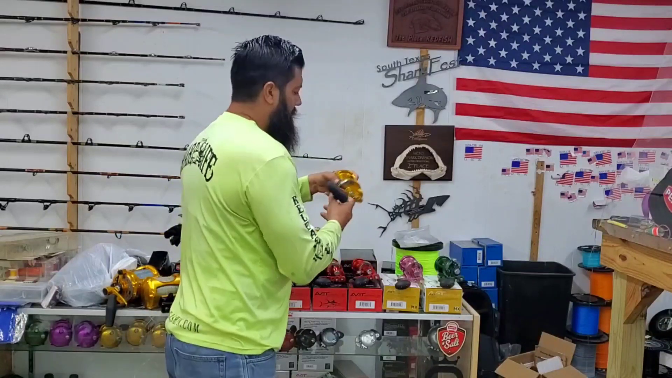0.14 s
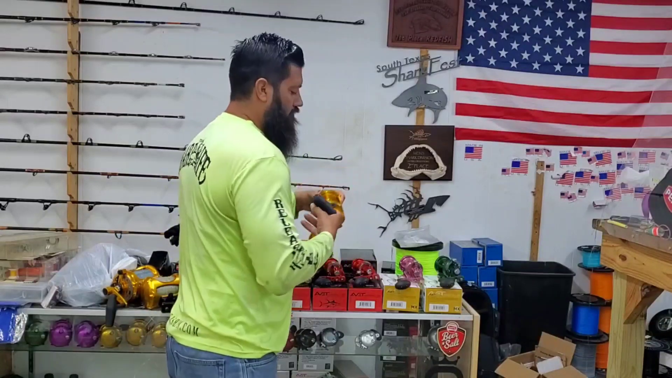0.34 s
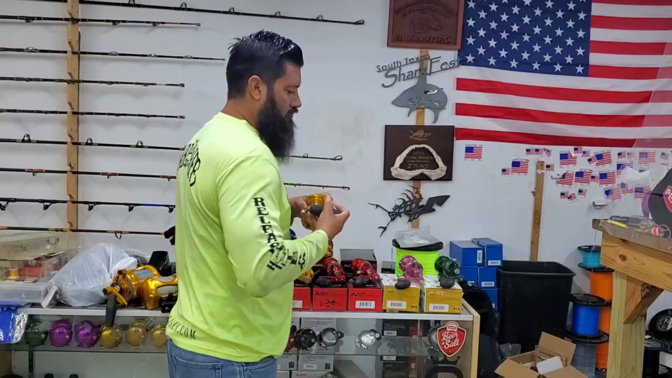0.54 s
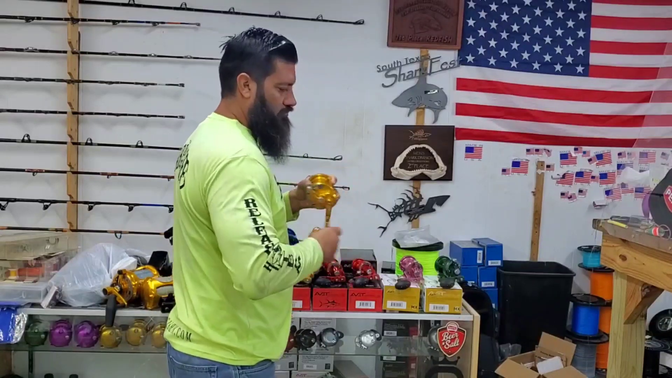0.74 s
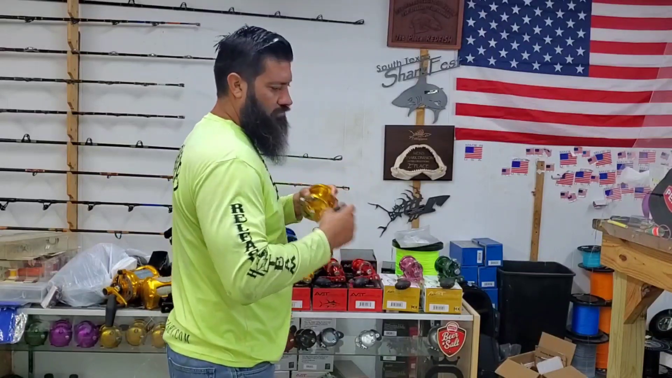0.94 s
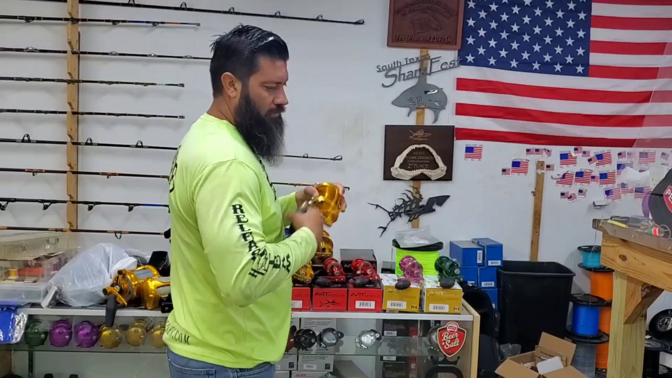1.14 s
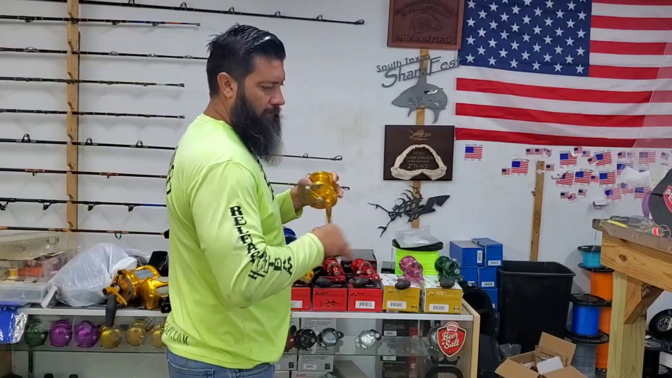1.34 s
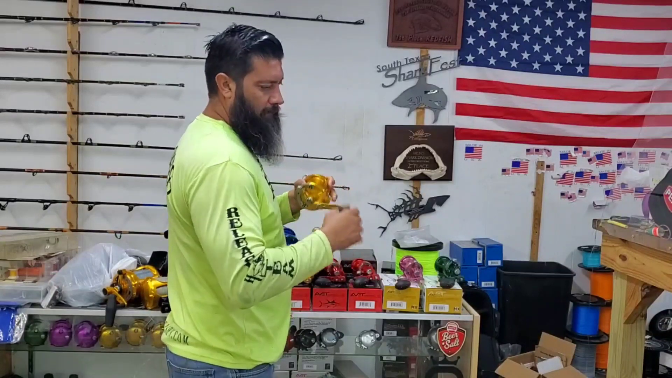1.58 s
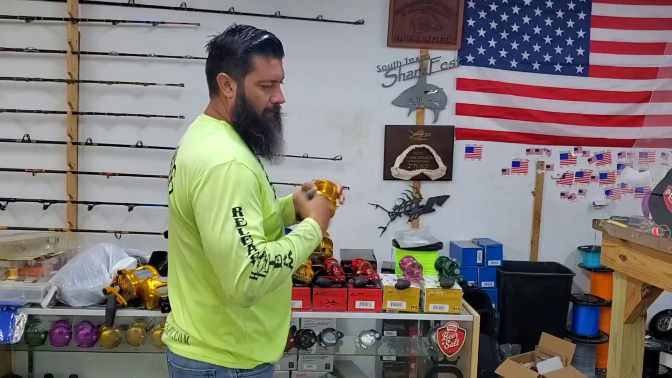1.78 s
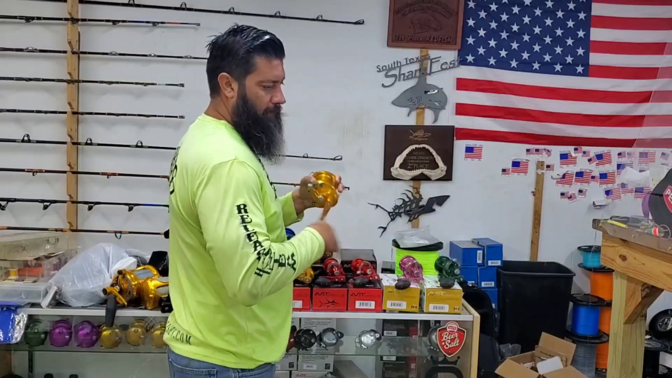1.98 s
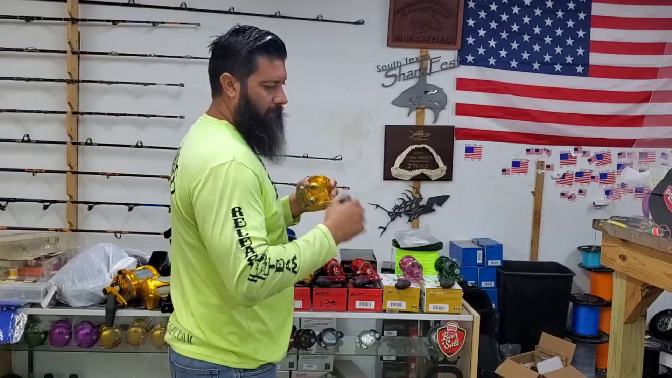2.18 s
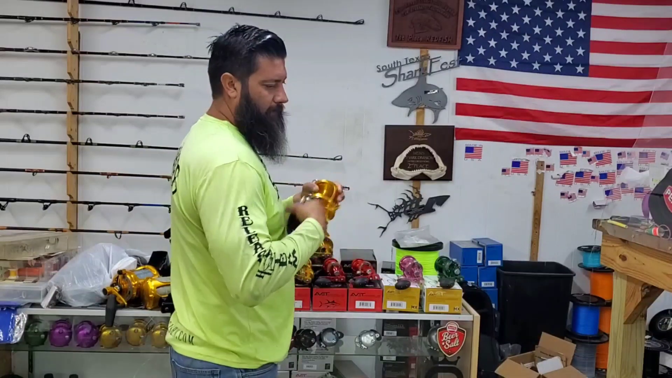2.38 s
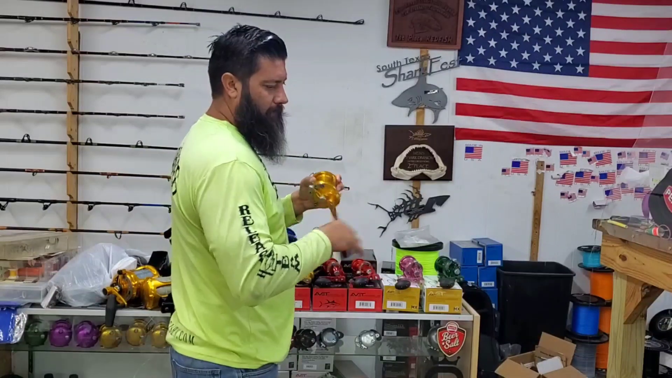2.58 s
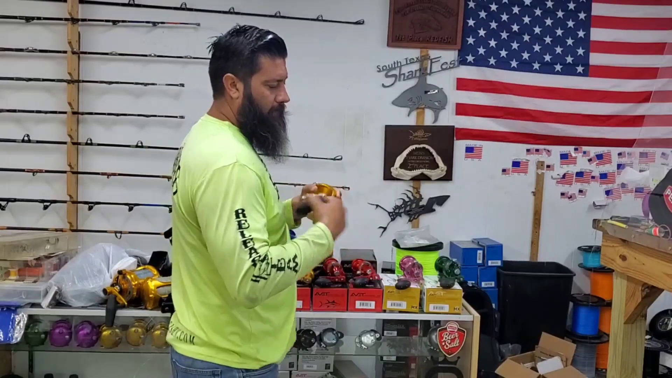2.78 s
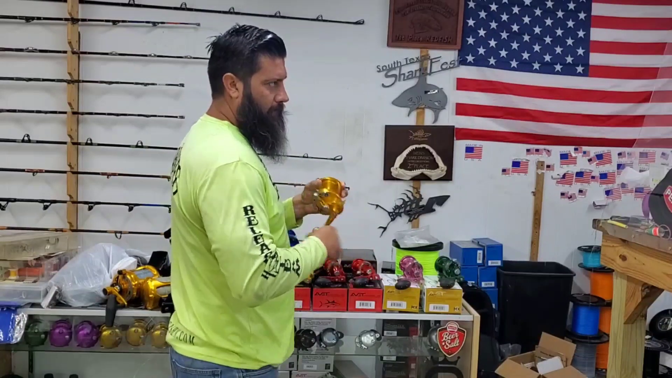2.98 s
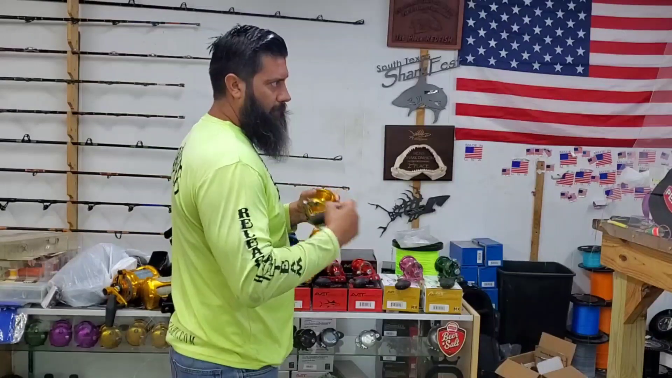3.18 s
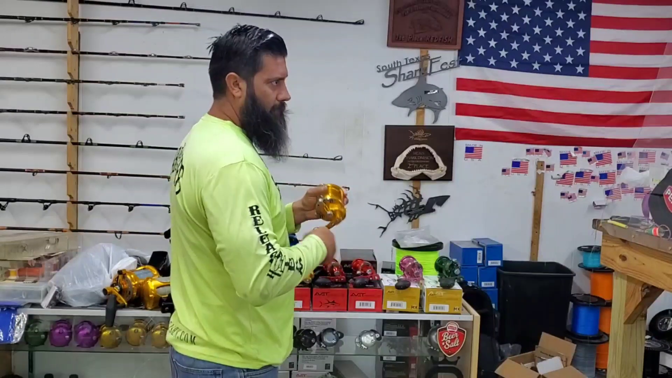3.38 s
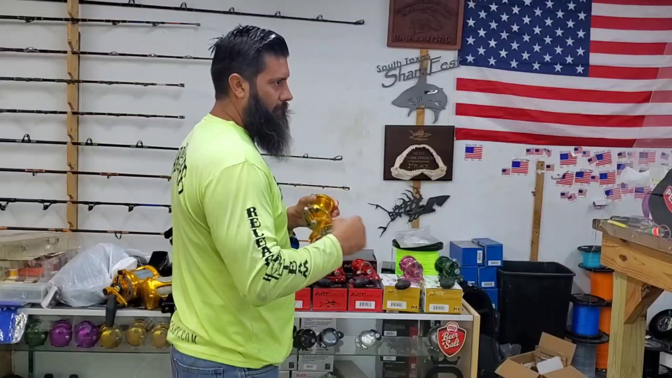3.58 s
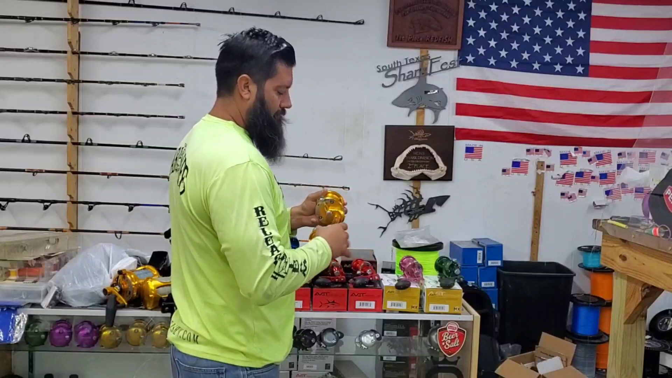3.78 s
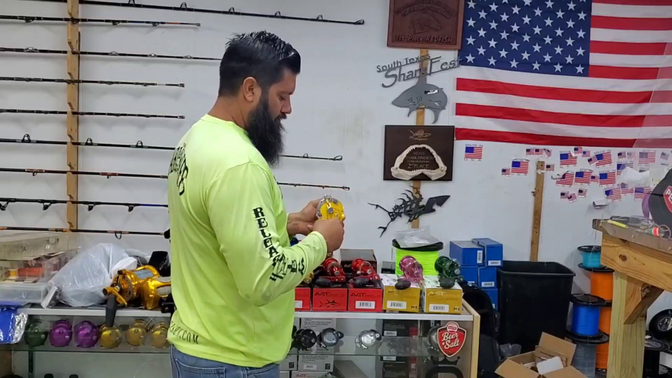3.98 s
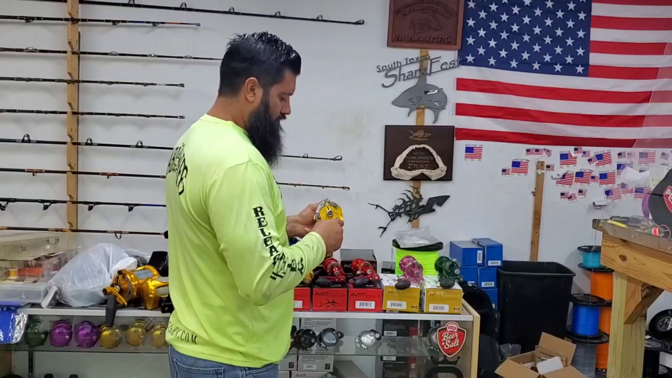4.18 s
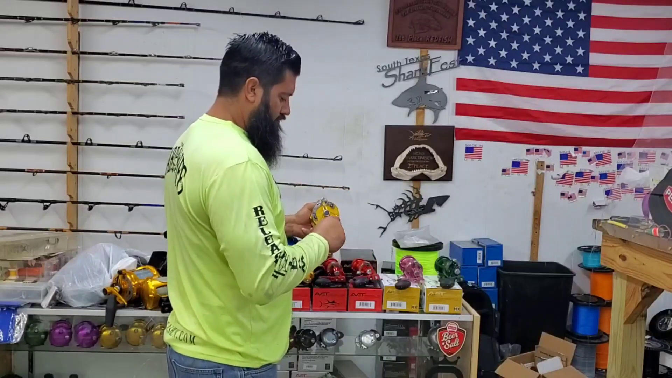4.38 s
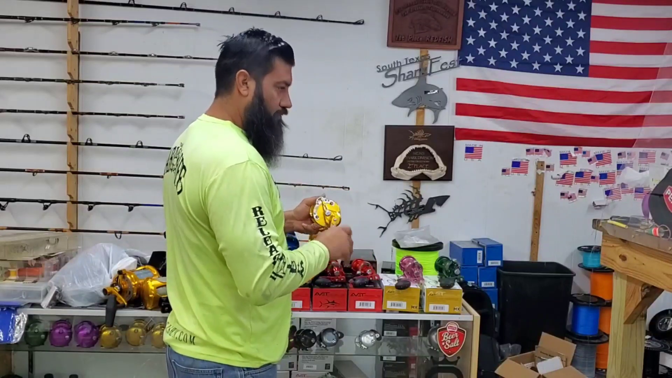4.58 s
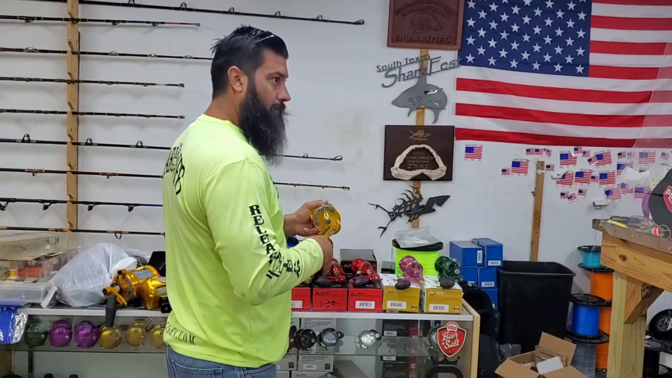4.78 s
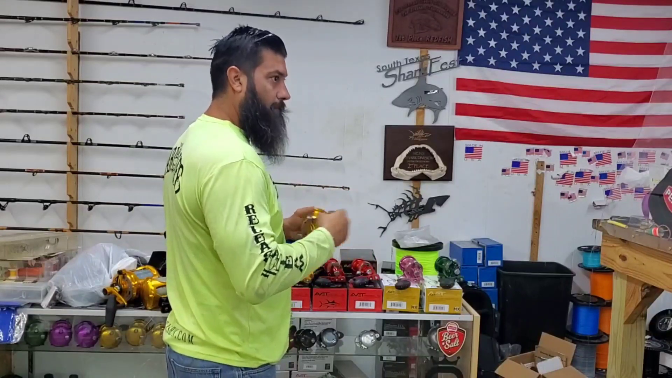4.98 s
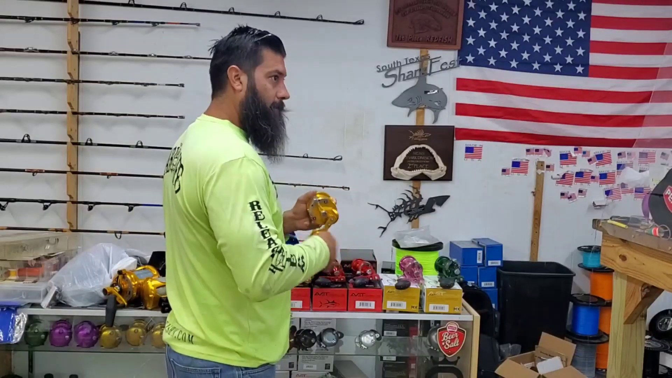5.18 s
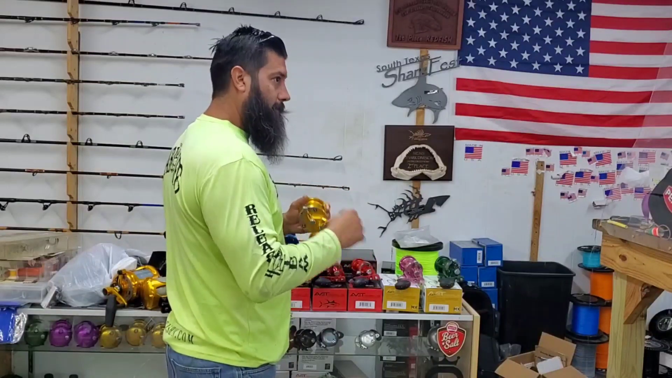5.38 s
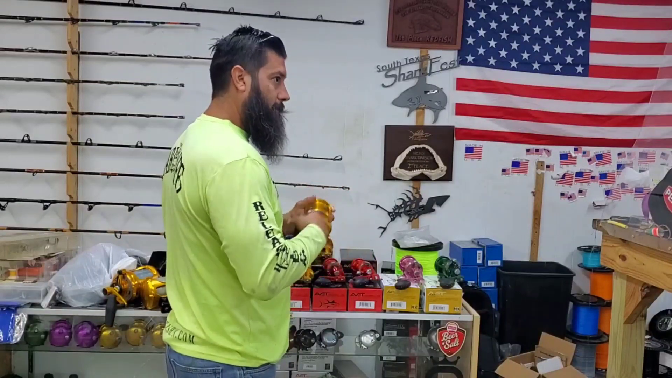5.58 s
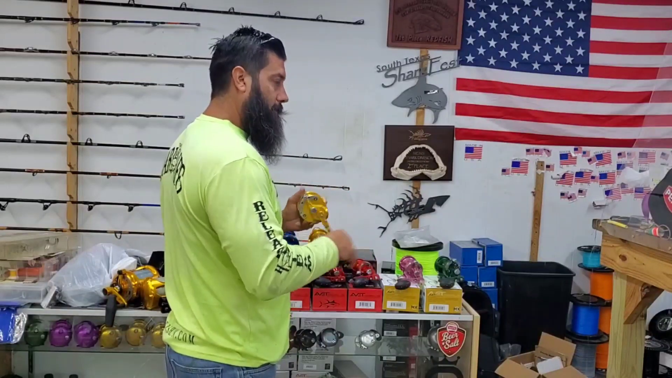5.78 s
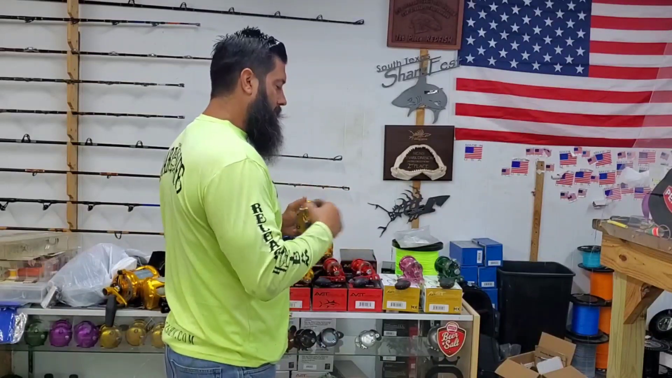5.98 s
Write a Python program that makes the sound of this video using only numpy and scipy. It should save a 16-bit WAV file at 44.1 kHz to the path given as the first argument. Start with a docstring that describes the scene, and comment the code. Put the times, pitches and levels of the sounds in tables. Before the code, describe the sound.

A metal fishing reel's clicker ticks, then buzzes in a long run, stops, snaps over, and buzzes over twice as fast, above low ventilation rumble.

```python
"""Ventilation rumbles and hums in a shop; over it the clicker of a big metal fishing reel ticks, a few steps away.
The pawl ticks over single teeth, then buzzes at about 100 teeth a second; the reel stops, a lever snaps over,
and a second run goes more than twice as fast. Each tooth is an impulse through resonances of pawl, spool,
side plate and frame. Noise reflections blur the ticks; the ventilation is filtered noise with wavering sines."""
import sys
import numpy as np
from scipy import signal
from scipy.fft import rfft, irfft, next_fast_len
from scipy.io import wavfile
from scipy.ndimage import uniform_filter1d

SR = 44100
rng = np.random.default_rng(int(sys.argv[2]) if len(sys.argv) > 2 else 0)


def dump_mix(stems):
    """Bounce the given channels to the path in sys.argv[1] as a 16-bit WAV at rate SR."""
    frames = np.atleast_2d(stems).T  # one column per channel
    limited = np.clip(frames, -1, 1)  # hard clip at full scale
    pcm = np.round(limited * 32767).astype(np.int16)
    wavfile.write(sys.argv[1], SR, pcm)


N = 266356
TIME = np.arange(N) / SR
BINS = np.fft.rfftfreq(8192, 1 / SR)

# single teeth while the spool barely turns:
# (time [s], relative tick level [dB], relative level of the side plate's ring [dB])
SINGLE_TEETH = [(0.172, -22, -36), (.2140, -2.5, -6), (.2500, -1, 1), (.2835, -0.5, 2), (.3330, 2, -3.5),
                (0.3935, -0.5, -4), (0.418, -29, -36), (0.504, -1, -3.5), (.5390, 0, 0), (.5660, 2.5, -1.5),
                (.6010, -1, -1), (.6390, 1.5, 0), (.6980, -0.5, -14), (.7200, 0.5, 3), (.7400, 0.5, -9),
                (3.8105, 0, -9), (3.8330, -5.5, -5), (3.8630, -3.5, -20), (3.8725, -11, -6.5),
                (4.8575, -2.5, -1), (4.8735, 0, 1.5)]
# spectrum of the pawl's dry tick: (frequency [Hz], relative level [dB])
TICK_COLOUR = [(200, -22), (700, -18.5), (1300, -19), (2150, -11.5), (2580, -16), (3480, -16), (3740, 1),
               (4250, -1.5), (5600, -4.5), (6900, -2.5), (8700, -8.5), (9500, -0.5), (10900, -7.5),
               (13400, 3.5), (15500, -10.5)]
# modes of the spool and its housing:
# (frequency [Hz], width [Hz], relative level at low speed [dB], relative level at high speed [dB])
SPOOL_MODES = [(2870, 202, -4, -1.5), (3212, 113, -6, -2), (4681, 73, 13, 13), (7460, 170, 0.5, 3),
               (7780, 50, 0.5, 8.5), (8290, 150, 3.5, 5.5), (8990, 48, 9, 13.5), (9930, 220, 9.5, 13),
               (10060, 50, 16, 19), (11840, 610, 1, 10), (13350, 77, 3.5, 7)]
# the hand pushes the crank harder or eases off, and the spool follows:
# (centre time [s], length [s], extra speed [teeth/s])
HAND_PUSHES = [(1.13, .2, 12), (2.74, .13, 14), (3.02, 0.16, 23), (3.31, .17, 29.5), (3.70, .16, 26.5),
               (4.96, 0.089, 14), (5.08, .1, -15.5), (5.18, .12, 28), (5.32, .1, -7), (5.595, .25, 53),
               (5.83, .1, 26)]
# the side plate rings out more loudly: (centre time [s], length [s], boost [dB])
PLATE_SWELLS = [(1.14, 0.058, 4.5), (1.61, 0.12, 3), (2.69, 0.078, 7.5), (3.03, .14, 5), (3.35, 0.17, 5.5),
                (3.74, 0.087, 7.5), (5.02, 0.33, 4), (5.32, 0.093, 6), (5.59, 0.24, 9), (5.98, 0.26, 7.5)]
# course of the frame's whine in each run: (time [s], relative level [dB])
SLOW_RUN_WHINE = [(0.75, -55.5), (0.89, -43.5), (2.47, -43.5), (3.4, -48.5), (3.52, -54.5), (3.72, -46),
                  (3.8, -56)]
FAST_RUN_WHINE = [(4.88, -69), (4.938, -45), (5.096, -45.5), (5.17, -40), (5.486, -44), (5.654, -50),
                  (5.804, -40.5), (6.04, -48.5)]
# the lever snaps over and rattles: (time [s], relative level [dB])
LEVER_SNAPS = [(4.4470, -6.5), (4.4500, -1), (4.4644, -17)]
# spectrum of the lever's snap: (frequency [Hz], relative level [dB])
SNAP_COLOUR = [(150, -17.5), (500, -8), (1000, 1.5), (1500, -2), (2300, 3.5), (4000, 1), (5700, -5),
               (7200, -5), (8300, -0.5), (10000, -4.5), (12000, 0.5), (15500, -4)]
# light touches on the handle: (time [s], relative level of the low ping [dB], of the high ping [dB])
HANDLE_TOUCHES = [(.178, -41.5, -53), (4.767, -54, -55), (4.793, -51, -73)]
# the handle's two pings, low and high: (frequency [Hz], time to fall by 60 dB [s])
HANDLE_PINGS = [(5700, 0.14), (9330, 0.11)]
# balance of the reel's ticks: (frequency [Hz], left over right [dB])
TICK_BALANCE = [(500, 3), (1000, 3.5), (3000, -0.5), (4700, 3.5), (6400, -7), (7000, -2), (7850, 13),
                (8400, 1), (9000, -1), (10000, 1.5), (12300, 0), (13400, -3.5), (15000, 19)]
# decay of the shop's reflections: (frequency [Hz], time to fall by 60 dB [s])
ROOM_DECAY = [(300, 0.15), (800, 0.24), (2000, 0.35), (5500, 0.29), (10000, 0.33), (15000, 0.21)]
# spectrum of the ventilation's air: (frequency [Hz], relative density [dB per Hz])
AIR_COLOUR = [(15, -30.5), (27, -21), (42, -6), (85, -3.5), (130, -8), (160, -4), (205, -13), (330, -16.5),
              (600, -22), (760, -21), (1000, -28), (2500, -36), (6000, -51), (15500, -57.5)]
# how alike the air is in both channels: (frequency [Hz], left-right correlation)
AIR_CORRELATION = [(60, 0.97), (150, 1), (300, 0.88), (600, 0.75), (1500, 0.0028), (8000, 0)]
# hum of the fan motor: (frequency [Hz], level [dB])
MOTOR_HUM = [(81.5, -45.5), (120, -44.5), (240, -53.5)]

PLATE_HZ, PLATE_WIDTH_HZ = 6400, 67
FRAME_WIDTH_HZ = 145


def run(rooms, speed, whine_level, fast, wobble, buzz_db, buzz_sag_db_per_s, push_db, ring_db,
        ring_sag_db_per_s, frame_db, frame_hz, direct_db, jitter_s, uneven_db):
    """A tooth passes at each whole turn of the phase: it ticks, rings the side plate and shakes the frame."""
    s, steady = np.transpose(speed)
    start, end = s[0], s[-1]
    inside = (TIME >= start) & (TIME < end + .5)  # leaves time to ring out
    t = TIME[inside]

    # the pace: steady cranking, the hand's pushes and a waver
    cruise = np.interp(t, s, steady)
    pushed = cruise + bumps(HAND_PUSHES, t)
    rate = pushed * np.exp(wobble * flutter(len(t), rate_hz=6))
    phase = np.cumsum(rate * (t < end)) / SR
    times = t[np.diff(np.ceil(phase), prepend=0) > 0]

    # no two teeth are quite alike in timing and force; faster teeth are each weaker
    timing, uneven = rng.standard_normal((len(times), 2)).T
    sizes = gain_of(uneven_db * uneven) * np.sqrt(SR / np.interp(times, t, rate))

    # the force rises quickly, then drifts; a push adds push_db for each doubling of the speed
    age = np.minimum(t, end) - start
    attack = 1 - np.exp(-age / .026)
    push_boost_db = push_db * np.log2(pushed / cruise)
    buzz = attack * gain_of(buzz_db - buzz_sag_db_per_s * age + push_boost_db)
    swell_db = bumps(PLATE_SWELLS, start + age)
    chance_db = 2 * flutter(len(t), rate_hz=11)
    ring = attack * gain_of(ring_db - ring_sag_db_per_s * age + swell_db + chance_db)
    whine = gain_of(frame_db + np.interp(t, *np.transpose(whine_level)))

    drive = pawl(times - t[0] + jitter_s * timing, sizes, len(t))
    ticks = in_room(body_smear(convolve(drive * buzz, reel(fast))), rooms, direct_db)
    plate = in_room(convolve(drive, mode(PLATE_HZ, PLATE_WIDTH_HZ)), rooms, direct_db)
    # the heavy frame feels the regular push of the teeth,
    # so harmonics of the speed glide through its resonance
    pushes = blows(times - t[0] + jitter_s * timing / 3, sizes, len(t))
    frame = in_room(convolve(pushes, mode(frame_hz, FRAME_WIDTH_HZ)), rooms, direct_db=-3.5)

    out = np.zeros((2, N))
    out[:, inside] = ticks + ring * driven(plate, t, start, end) + whine * driven(frame, t, start, end)
    return out


def spool(start_s, end_s, first_rate, full_rate, spin_up_s, tiring_per_s3):
    """Rows (time [s], speed [teeth/s]): the spool spins up exponentially, then slows as the arm tires."""
    age = np.linspace(0, end_s - start_s, num=200)
    spinning_up = (first_rate - full_rate) * np.exp(-age / spin_up_s)
    return np.transpose([start_s + age, full_rate + spinning_up - tiring_per_s3 * age ** 2])


def single_teeth(level_db=2.3, ring_db=2, frame_db=-19, settle_db=-8, settle_s=.017):
    """Separate ticks as the spool starts and stops, each with a ring of side plate and frame."""
    s, db, plate_db = np.transpose(SINGLE_TEETH)
    # at this slow pace the pawl has time to settle against the next tooth with a softer tick
    settle = s + settle_s * rng.uniform(.7, 1.3, len(s))
    first = pawl(s, gain_of(db + level_db))
    second = pawl(settle, gain_of(db + level_db + settle_db))
    drive = first + second
    ticks = body_smear(convolve(drive, reel(0)))
    plate = convolve(blows(s, gain_of(plate_db + ring_db)), mode(PLATE_HZ, PLATE_WIDTH_HZ))
    frame = gain_of(frame_db) * convolve(drive, mode(1050, FRAME_WIDTH_HZ))
    return ticks + plate + frame


def pawl(times, sizes, count=N, bounce=0.6, bounce_s=.002):
    """The pawl drops on each tooth and bounces once, after a slightly random wait."""
    late = rng.uniform(.3, 1.7, len(times))
    return blows(times, sizes, count) + blows(times + bounce_s * late, sizes * bounce, count)


def reel(fast, skirt=1.49):
    """One tooth heard left and right: the tick plus the modes, whose mix shifts with speed (fast 0-1)."""
    power = gain_of(read(TICK_COLOUR, BINS)) ** 2
    for hz, width, slow_db, fast_db in SPOOL_MODES:
        peak = gain_of(slow_db + fast * (fast_db - slow_db)) ** 2
        power = power + peak / (1 + (2 * (BINS - hz) / width) ** 2) ** skirt
    half_balance_db = read(TICK_BALANCE, BINS) / 2
    return np.array([causal(np.sqrt(power) * gain_of(side * half_balance_db)) for side in (1, -1)])


def mode(hz, width):
    """A strong resonance with steep skirts and energy 1."""
    t = TIME[:SR // 8]
    ring = t * np.exp(-np.pi * width * t) * np.sin(2 * np.pi * hz * t)
    return ring / np.linalg.norm(ring)


def driven(tone, t, start, end):
    """Holds a ring near level 1 while the teeth drive it; afterwards it dies freely."""
    power = tone.mean(0) ** 2 + (tone ** 2).mean(0)
    swell = np.sqrt(abs(uniform_filter1d(power, size=3000)) / 2 + 1e-6)
    return tone / np.interp(np.clip(t, start + 0.13, end - .02), t, swell)


def body_smear(x, smear_s=0.000415):
    """The reel's body delays each frequency a little, differently towards left and right."""
    knots = rng.random((2, 12))
    shape = [np.interp(BINS, np.linspace(0, SR / 2, len(side)), side) for side in knots]
    delay = smear_s * 2 * np.array(shape)
    # summing group delay over frequency gives the phase of an all-pass
    phase = -2 * np.pi * np.cumsum(delay, axis=1) * BINS[1]
    return convolve(x, irfft(np.exp(1j * phase))[:, :SR // 100])


def lever(level_db=6):
    """A dull snap with hardly any ring: impulses through a broad spectrum."""
    s, db = np.transpose(LEVER_SNAPS)
    return convolve(blows(s, gain_of(db + level_db)), causal(gain_of(read(SNAP_COLOUR, BINS))))


def handle():
    """Faint metal pings, decaying sines, at light touches of the hand."""
    s, *levels = np.transpose(HANDLE_TOUCHES)
    t = TIME[:SR // 3]
    pings = 0
    for db, (hz, t60) in zip(levels, HANDLE_PINGS):
        ping = np.sin(2 * np.pi * hz * t) * gain_of(-60 * t / t60)
        pings = pings + convolve(blows(s, gain_of(db)), ping)
    return pings


def in_room(x, rooms, direct_db, sway_hz=1.6):
    """Direct sound plus reflections; as the reel sways in the hand, it passes from one set of paths to the next."""
    angle = 2 * np.pi * sway_hz * TIME[:x.shape[-1]]
    wet = 0
    for k, room in enumerate(rooms):
        share = np.cos(angle + np.pi * k / len(rooms)) * np.sqrt(2 / len(rooms))
        wet = wet + convolve(x * share, room)
    return (wet + gain_of(direct_db) * x) / np.hypot(1, gain_of(direct_db))


def shop(early_db=-13.0, early_s=0.017):
    """Two-channel reflections with energy near 1: quick scatter off counter and wall, and a dense tail."""
    t = TIME[:SR // 2]
    hz, at, z = signal.stft(rng.standard_normal((2, len(t))), SR, nperseg=256)
    decay = gain_of(-60 * at / read(ROOM_DECAY, hz)[:, None])
    tail = signal.istft(z * decay, SR, nperseg=256)[1][:, :len(t)]
    scatter = rng.standard_normal(tail.shape) * np.exp(-t / early_s)
    # the room keeps its fine comb but favours no broad band
    spectrum = rfft(evened(tail) + gain_of(early_db) * evened(scatter), 2 * len(t))
    broad = np.sqrt(uniform_filter1d(abs(spectrum) ** 2, size=200, axis=1))
    return irfft(spectrum / broad)[:, :len(t)]


def ventilation(air_db=-37.5, waver=0.26):
    """Rumbling air, noise alike in both channels in the bass, and a motor hum whose phase wavers."""
    size = next_fast_len(N, True)
    hz = np.fft.rfftfreq(size, 1 / SR)
    a, b = rfft(rng.standard_normal((2, size)))
    same = np.clip(read(AIR_CORRELATION, hz), -1, 1)
    pair = np.array([a, same * a + np.sqrt(1 - same ** 2) * b])
    air = evened(irfft(pair * gain_of(read(AIR_COLOUR, hz)))[:, :N])
    hum = 0
    for f, db in MOTOR_HUM:
        drift = evened(irfft(rfft(rng.standard_normal(size)) / (1 + (hz / 3) ** 4))[:N])
        tone = np.sin(2 * np.pi * f * TIME + waver * np.pi * drift)
        hum = hum + gain_of(db) * np.sqrt(2) * tone
    return gain_of(air_db) * air + hum


def blows(times, sizes, count=N):
    """A train of single impulses."""
    return np.bincount(np.maximum(np.round(times * SR), 0).astype(int), sizes, count)[:count]


def bumps(rows, t):
    """Sum of rounded humps, one for each row (centre time [s], length [s], height)."""
    return sum(height * np.exp(-abs(2 * (t - s) / length) ** 3) for s, length, height in rows)


def flutter(count, rate_hz):
    """A slow random waver of rms 1: noise kept below about rate_hz."""
    hz = np.fft.rfftfreq(count, 1 / SR)
    return evened(irfft(rfft(rng.standard_normal(count)) / (1 + (hz / rate_hz) ** 4), count))


def gain_of(db):
    """Turns decibels into an amplitude factor."""
    return 10 ** (np.asarray(db) / 20)


def evened(x):
    """Scales to rms 1."""
    return x / np.sqrt(np.mean(x ** 2) + 1e-20)


def read(points, hz):
    """Reads a table on a log-frequency axis."""
    f, value = np.transpose(points)
    return np.interp(np.log(hz + 1), np.log(f + 1), value)


def causal(gain):
    """The minimum-phase response with this gain: it starts at once and then rings out."""
    cepstrum = irfft(np.log(np.maximum(gain, 1e-5)))
    half = len(cepstrum) // 2
    # fold the cepstrum onto positive time
    cepstrum[1:half] *= 2
    cepstrum[half + 1:] = 0
    return irfft(np.exp(rfft(cepstrum)))[:half]


def convolve(x, response):
    """Filters one or two channels and keeps the length."""
    return signal.oaconvolve(np.atleast_2d(x), np.atleast_2d(response), axes=1)[:, :x.shape[-1]]


def scene():
    """The reel's sounds in one room, over the ventilation."""
    rooms = [shop(), shop(), shop()]
    easy = spool(start_s=.745, end_s=3.8, first_rate=59, full_rate=105, spin_up_s=.1, tiring_per_s3=3.2)
    hard = spool(start_s=4.875, end_s=6.04, first_rate=140, full_rate=238, spin_up_s=.12, tiring_per_s3=1.5)
    slow = run(rooms, easy, SLOW_RUN_WHINE, fast=0, wobble=.09,
               buzz_db=-21.0, buzz_sag_db_per_s=1.47, push_db=4, ring_db=-26, ring_sag_db_per_s=1.5,
               frame_db=3.5, frame_hz=1040, direct_db=-7.5, jitter_s=.0003, uneven_db=2.5)
    # negative sags: the second run grows louder
    quick = run(rooms, hard, FAST_RUN_WHINE, fast=0.94, wobble=.008,
                buzz_db=-18.5, buzz_sag_db_per_s=-0.5, push_db=5.5, ring_db=-25, ring_sag_db_per_s=-0.5,
                frame_db=5.5, frame_hz=1003, direct_db=-5.0, jitter_s=.00015, uneven_db=2.0)
    handling = in_room(single_teeth() + body_smear(lever()) + handle(), rooms, direct_db=-11)
    return slow + quick + handling + ventilation()


def record(dry, knee_db=-23.5, squeeze=0.45, edge_hz=15600):
    """Slow gain control turns everything down under the buzz; then a low-pass limits the band."""
    keep = np.exp(-1 / (.15 * SR))  # level is averaged over about 0.15 s
    power = signal.lfilter([1 - keep], [1, -keep], (dry ** 2).mean(0))
    power_db = 10 * np.log10(power + 1e-12)
    ducked = dry * gain_of(-squeeze * np.maximum(power_db - knee_db, 0))
    low_pass = signal.firwin(511, edge_hz, window=("kaiser", 9), fs=SR)
    return signal.oaconvolve(ducked, low_pass[None], "same")


dry = scene()
out = record(dry)
dump_mix(out)
```